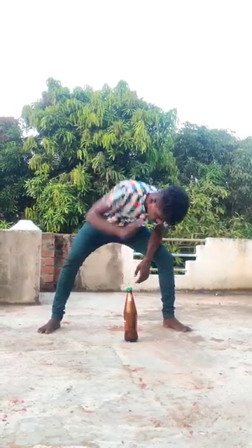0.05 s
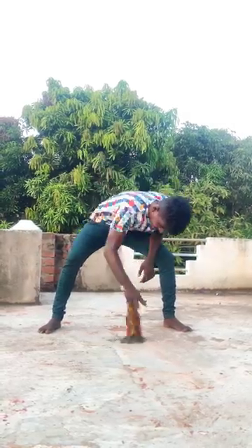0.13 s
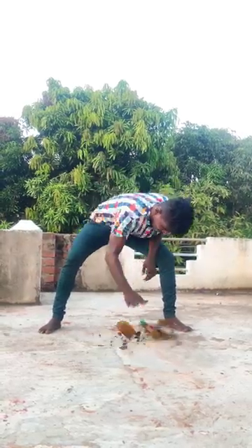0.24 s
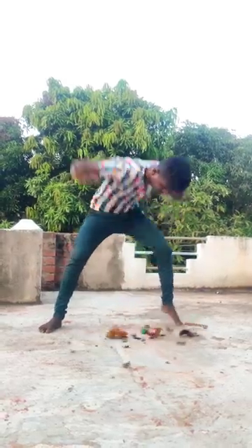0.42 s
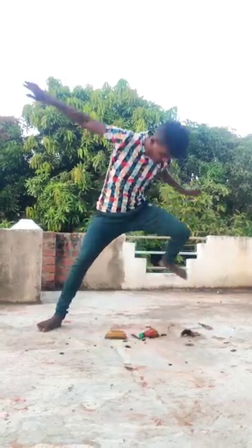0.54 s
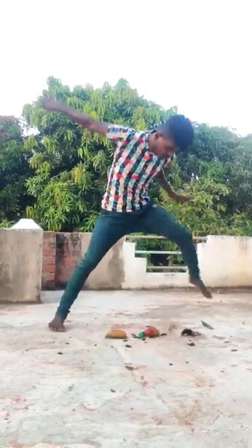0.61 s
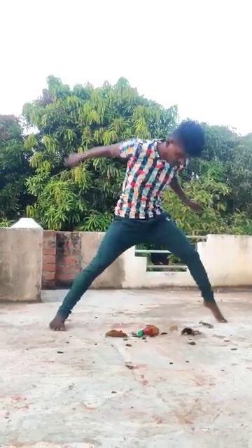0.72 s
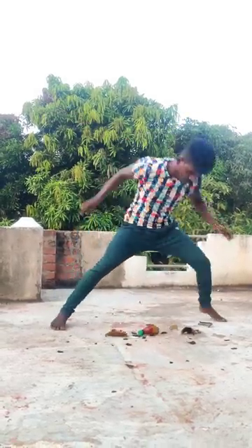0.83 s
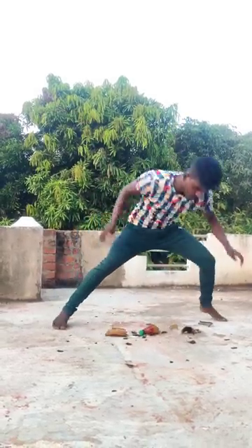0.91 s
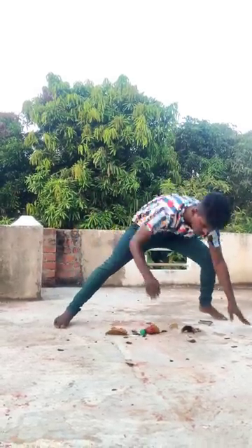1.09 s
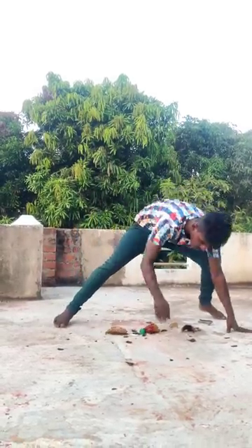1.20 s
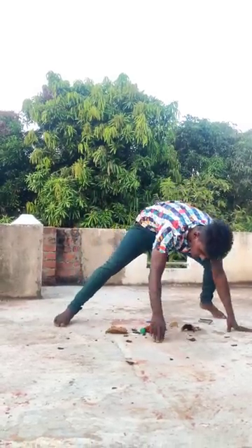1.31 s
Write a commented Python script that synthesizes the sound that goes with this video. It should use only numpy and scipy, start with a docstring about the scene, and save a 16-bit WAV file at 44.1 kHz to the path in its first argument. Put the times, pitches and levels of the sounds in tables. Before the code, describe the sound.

A glass bottle smashes on concrete, with liquid spattering and shards clinking as they settle.

```python
"""Clothes rustle with a swing, then a glass bottle cracks, thuds and bursts on a concrete terrace.
Splinters and liquid spray over the floor while a hollow note sinks. The larger pieces bounce, each
contact exciting their natural modes. A bare foot slaps down, a faint far tone comes and goes, and
the last pieces settle. Throughout, outdoor air murmurs and low walls return short echoes."""
import sys
import numpy as np
from scipy import signal
from scipy.fft import rfft, irfft
from scipy.io import wavfile
from scipy.ndimage import uniform_filter1d

SR = 44100
rng = np.random.default_rng(int(sys.argv[2]) if len(sys.argv) > 2 else 0)


def persist_wave(psi):
    """Save psi, clipped to +-1, as 16-bit WAV."""
    counts = np.round(np.clip(psi, -1, 1) * 32767).astype(np.int16)
    wavfile.write(sys.argv[1], SR, np.atleast_2d(counts).T)


N = 59535
TIME = np.arange(N) / SR

# Spectra of the noise sources. Each row: frequency in Hz, relative level in dB.
AIR_SPECTRUM = [(15, -51.5), (25, -9), (277, -12), (427, -10.5), (503, -3.5), (796, -15.5), (1020, -9),
                (1290, -20.5), (2110, -14.5), (2910, -23.5), (16000, -30)]
RUSTLE_SPECTRUM = [(200, -13), (480, 3.5), (750, -6.5), (1200, 10), (2000, 6.5), (3000, -11.5),
                   (12000, -26.5)]
SLAP_SPECTRUM = [(200, -40), (390, -35), (660, -15), (930, -7), (1100, -14), (1670, 0.5), (2050, -9.5),
                 (2500, -6.5), (3150, -20), (3560, -8), (4220, -30.5), (5500, -16), (7700, -39),
                 (12000, -50)]
SPATTER_SPECTRUM = [(100, -18), (220, -10), (400, -9), (1000, 0), (1600, -1), (2400, 0), (4000, -7),
                    (6500, -7), (9000, -22), (16000, -34)]
SPLINTER_SPECTRUM = [(2400, -6.5), (4000, -6), (6200, 4.5), (8000, -2.5), (11000, 2), (15000, -6.5)]
TICK_SPECTRUM = [(300, -51), (900, -2.5), (2500, 3), (6000, 3.5), (10500, -4), (16000, -25)]
THUD_SPECTRUM = [(40, -46.5), (100, -37), (170, -23.5), (280, -45.5), (380, 1), (600, -13.5), (920, -2),
                 (1400, -10.5), (2600, -14), (6000, -21)]
CRACK_SPECTRUM = [(40, -21), (90, -34.5), (300, -19.5), (555, -1.5), (1360, -7), (2650, -5), (5250, -1.5),
                  (6740, 0), (9000, -15), (14200, -15.5), (16000, -40.5)]
# Likeness of the noise at the two ears. Each row: frequency in Hz, left-right correlation.
CORRELATION = [(60, 1), (350, 0.75), (1000, 0.28), (3000, 0.5), (12000, 0.2)]
# Envelopes of cloth, liquid and splinters. Each row: time in seconds, level in dB.
RUSTLE_ENVELOPE = [(0, -52), (0.06, -66), (0.143, -73.5), (0.165, -55.5), (0.195, -50.5), (0.215, -41)]
SPATTER_ENVELOPE = [(0.205, -80), (0.225, -75), (0.28, -39.5), (0.36, -32.5), (0.42, -40), (0.47, -37.5),
                    (0.56, -42.5), (0.64, -44), (0.69, -45), (0.77, -54.5), (0.95, -66), (1.09, -55),
                    (1.14, -63), (1.19, -49), (1.28, -81)]
SPLINTER_ENVELOPE = [(0.205, -73), (0.215, -53), (0.275, -43), (0.34, -32), (0.41, -34.5), (0.47, -37.5),
                     (0.52, -38.5), (0.56, -39.5), (0.65, -51.5), (0.76, -52.5), (0.93, -67.5), (1.08, -55),
                     (1.15, -57.5), (1.35, -78)]
# Partials of the far tone. Each row: frequency in Hz, level in dB.
FAR_PARTIALS = [(763, -64.5), (1013, -66), (1268, -73)]
# Course of the hollow note. Each row: time in seconds, frequency in Hz, level in dB.
HOLLOW_GLIDE = [(0.28, 669.3, -68), (0.307, 632.8, -34.5), (0.333, 610, -45.5), (0.431, 599, -47.5),
                (0.484, 560.6, -33.5), (0.53, 562, -47.5), (0.58, 559.6, -40), (0.661, 559, -56.5),
                (0.781, 563, -76)]
# Blows of the foot, the bottle's body and the breaking glass.
# Each row: start in seconds, level in dB, time to decay by 60 dB (T60) in seconds.
FOOT_SLAPS = [(0.8018, -11.5, 0.026), (0.8085, -29.5, 0.015), (0.828, -26, 0.021), (0.853, -53, .09)]
BODY_THUDS = [(0.2055, -23.5, 0.15), (0.2215, -14, 0.069), (0.231, -22, 0.12)]
GLASS_CRACKS = [(0.2053, -5, 0.017), (0.2105, -14, 0.061), (0.231, -22.5, 0.037)]
# Modes of the slap's hollow ring and of each named glass piece.
# Each row: frequency in Hz, relative level in dB, T60 in seconds, left minus right in dB.
SLAP_MODES = [(385, -45.5, 0.13, -3), (952, -27, 0.11, -0.5), (1598, -28.5, 0.047, -10),
              (1765, -22.5, 0.053, 4.5), (2390, -44, 0.065, -5)]
PIECE_MODES = { "large": [(2276, -1, 0.23, 0), (2300, -16.5, 0.24, -7.5), (1980, -23.5, 0.61, 0),
               (3470, -16.5, 0.23, -14), (4880, -16, 0.19, 1.5), (6255, -20.5, 1, -0.5),
               (7000, -9.5, 0.12, 2.5)], "bright": [(2980, -5.5, 0.17, 0), (4556, -29, 0.96, -17),
               (5600, -8.5, 0.2, 6), (5593, 4.5, 0.065, 7), (5946, -3.5, 0.088, 6), (6990, -13.5, 0.39, 2),
               (8400, -7.5, 0.082, -9), (10900, -10, 0.067, 15), (10530, -29, 0.06, 3),
               (12820, -22.5, .14, -15)], "flat": [(2270, -2, 0.098, 7), (2290, 1, .1, 4),
               (3600, -10, 0.057, -14), (5002, 0, 0.11, 1)], "curved": [(2685, -2.5, 0.12, 6),
               (2663, -12, 0.32, 2), (2430, -3, 0.057, -1.5), (3053, -14, 0.099, -17),
               (5022, -2.5, 0.11, 2.5), (5628, 0.5, 0.057, 6.5)], "thin": [(4040, 1.5, 0.086, -19),
               (4950, -5, 0.45, 9), (6210, 12, 0.11, 0), (6360, 7, 0.086, 9), (8400, -21, 0.36, -3.5),
               (8900, -16, 0.145, 4.5), (9870, 1, 0.18, 12.5), (11560, -22, 0.16, -8.5),
               (14400, -13.5, .14, -11)]}
# Pieces hit the floor.
# Each row: start in seconds, piece, ring level in dB, tick level in dB, left minus right in dB.
BOUNCES = [(0.298, "curved", -32, -21, 0), (0.321, "thin", -34, -12.5, 6.5),
           (0.326, "curved", -58, -29, -7), (0.3419, "bright", -17.5, -13.5, 0.5),
           (0.344, "curved", -22, -29, -2), (0.353, "large", -21, -35, 6.5),
           (0.367, "bright", -30, -19, -14), (0.424, "curved", -27, -45, -1),
           (0.443, "large", -26, -25.5, 20), (0.457, "large", -31.5, -32, 23),
           (0.4785, "thin", -39, -26, 4), (0.5394, "curved", -36, -20, -4),
           (0.547, "large", -32, -35, 14.5), (0.5948, "thin", -44, -50, -14),
           (0.6355, "thin", -48.5, -28, -7), (0.6633, "bright", -28.5, -16.5, 5.5),
           (0.680, "thin", -49, -21, 7.5), (0.701, "flat", -34, -44, 2.5),
           (0.748, "bright", -43, -33.5, 3.5), (0.842, "thin", -77, -50, 12),
           (0.881, "thin", -66, -36.5, -1), (0.896, "flat", -41.5, -46, 9.5),
           (0.908, "flat", -40.5, -36, 2), (1.072, "curved", -50.5, -40.5, 15),
           (1.081, "bright", -43.5, -37.5, 4.5), (1.169, "curved", -37, -31, 7.5),
           (1.182, "bright", -47.5, -54, 5.5), (1.194, "curved", -43, -41.5, -13.5),
           (1.206, "flat", -57, -50, 10.5)]
# Wall reflections. Each row: left and right delays in seconds, gain before filtering in dB.
WALL_ECHOES = [(0.013, .015, -13.5), (.027, .0285, -32), (.053, .051, -32)]

LEFT_LEAD_S, SPRAY_PAN_DB = 0.0001, 0.5


def from_db(db):
    """Amplitude grows tenfold for every 20 dB."""
    return 10 ** (np.asarray(db) / 20)


def unit_rms(x):
    """Division by the rms value gives unit mean power."""
    return x / np.sqrt(np.mean(x ** 2) + 1e-20)


def envelope(rows):
    """Straight lines in dB give exponential rises and falls, with silence outside them."""
    return from_db(np.interp(TIME, *np.transpose(rows), left=-150, right=-150))


def at_hz(points, hz):
    """Interpolation in log frequency treats all octaves alike."""
    frequencies, values = np.transpose(points)
    return np.interp(np.log(np.maximum(hz, 1)), np.log(frequencies), values)


def place(x, pan_db, lead_s=0):
    """Differences of level and arrival time set direction; positive values favour the left."""
    left, right = np.broadcast_to(x, (2, N))
    delayed = np.interp(TIME - lead_s, TIME, right)
    return np.array([left * from_db(pan_db / 2), delayed * from_db(-pan_db / 2)])


def coloured(white, spectrum):
    """The weighted sum and difference of two independent signals form a partly correlated pair."""
    hz = np.fft.rfftfreq(N, 1 / SR)
    alike = np.clip(at_hz(CORRELATION, hz), -.99, .99)
    mid, side = rfft(white) * from_db(at_hz(spectrum, hz))
    mid, side = np.sqrt(1 + alike) * mid, np.sqrt(1 - alike) * side
    return unit_rms(irfft([mid + side, mid - side], N))


def noise(spectrum):
    """Filtered white noise takes on the spectrum of the filter."""
    return coloured(rng.standard_normal((2, N)), spectrum)


def decay(start, t60, contact_s=0.0015):
    """A damped vibration builds during contact and dies exponentially."""
    age = np.maximum(TIME - start, 0)
    return np.minimum(age / contact_s, 1) * from_db(-60 * age / t60)


def burst(source, start, db, t60):
    """An impact is a transient whose energy is set by its level and decay time."""
    shape = decay(start, t60)
    return from_db(db) * unit_rms(source * shape) * np.sqrt(np.mean(shape ** 2))


def blows(rows, spectrum):
    """Successive blows on one body share a spectrum and superpose."""
    return sum(burst(noise(spectrum), *row) for row in rows)


def grains(per_s, spread_db):
    """Independent small impacts form shot noise: random clicks of uneven size."""
    sizes = from_db(spread_db * np.minimum(rng.exponential(1, N), 4))
    return (rng.random(N) < per_s / SR) * sizes * rng.choice([-1, 1], N)


def modal_ring(modes, strikes, spread_db=2):
    """Each strike adds energy to every natural mode, and each mode loses it at its own rate."""
    ear_time = TIME - np.array([[0], [.00005]])  # the right ear hears it later
    out = 0
    for hz, mode_db, t60, mode_pan_db in modes:
        chance_db = spread_db * rng.standard_normal(len(strikes))
        energy = 0
        for (start, db, pan_db), extra_db in zip(strikes, chance_db):
            balance = from_db([pan_db + mode_pan_db, -pan_db - mode_pan_db])
            amplitude = from_db(db + mode_db + extra_db) * decay(start, t60)
            energy = energy + np.outer(balance, amplitude ** 2)
        out = out + np.sqrt(energy) * np.sin(2 * np.pi * (hz * ear_time + rng.random()))
    return out


def outdoor_air():
    """Stationary noise forms a quiet floor under the scene."""
    return from_db(-68) * noise(AIR_SPECTRUM)


def far_tone(start_s=0.94, end_s=1.17, fade_s=0.047):
    """Three steady partials superpose into a faint tone that fades in and out."""
    gate = np.clip(np.minimum(TIME - start_s, end_s - TIME) / fade_s, 0, 1)
    return gate * sum(from_db(db) * np.sin(2 * np.pi * hz * TIME) for hz, db in FAR_PARTIALS)


def clothes_rustle():
    """Friction in the cloth makes noise that follows the swing."""
    return place(envelope(RUSTLE_ENVELOPE) * noise(RUSTLE_SPECTRUM), SPRAY_PAN_DB)


def hollow_note(waver_db=3, upper_ratio=1.735, upper_db=-6.5):
    """A cavity resonance, likely air in the broken neck, wavers and sinks with a weaker upper mode."""
    times, hz, db = np.transpose(HOLLOW_GLIDE)
    phase = 2 * np.pi * np.cumsum(np.interp(TIME, times, hz)) / SR
    smoothing = signal.butter(2, 40, fs=SR, output="sos")
    waver = unit_rms(signal.sosfilt(smoothing, rng.standard_normal((2, N))))
    lower_gain, upper_gain = from_db(waver_db * waver)
    lower = lower_gain * np.sin(phase)
    upper = from_db(upper_db) * upper_gain * np.sin(upper_ratio * phase + waver[0])
    return place(np.sqrt(2) * (lower + upper) * envelope(list(zip(times, db))), 0, LEFT_LEAD_S)


def bare_foot(pan_db=1):
    """Ball and sole land, then scuff; the first impact excites a short hollow resonance."""
    slaps = place(blows(FOOT_SLAPS, SLAP_SPECTRUM), pan_db)
    return slaps + modal_ring(SLAP_MODES, [(FOOT_SLAPS[0][0], 0, pan_db)])


def spatter(drop_share=0.65):
    """The shot noise of drops and grit adds in power to a smooth wash of foam."""
    drops = unit_rms(np.array([grains(per_s=4600, spread_db=5) for _ in range(2)]))
    foam = rng.standard_normal((2, N))
    spray = coloured(np.sqrt(drop_share) * drops + np.sqrt(1 - drop_share) * foam, SPATTER_SPECTRUM)
    return place(spray * envelope(SPATTER_ENVELOPE), SPRAY_PAN_DB, LEFT_LEAD_S)


def splinters(count=56, t60_cycles=1500):
    """Each small fragment is a damped resonator with its own pitch and place, struck at random."""
    clicks = grains(per_s=800, spread_db=1.5)
    struck = rng.integers(0, count, N)
    pitches_hz = np.geomspace(2400, 15000, count) * rng.uniform(.98, 1.02, count)
    out = 0
    for k, hz in enumerate(pitches_hz):
        radius, angle = from_db(-60 * hz / (t60_cycles * SR)), 2 * np.pi * hz / SR
        feedback = [1, -2 * radius * np.cos(angle), radius * radius]
        ring = signal.lfilter([np.sin(angle)], feedback, clicks * (struck == k) + 1e-18)
        ring = place(ring, SPRAY_PAN_DB + 4 * rng.normal(), LEFT_LEAD_S * rng.normal(1, 1))
        out = out + from_db(at_hz(SPLINTER_SPECTRUM, hz)) * ring
    running_rms = np.sqrt(uniform_filter1d(np.mean(out ** 2, axis=0), size=2000) + 1e-12)
    return out / running_rms * envelope(SPLINTER_ENVELOPE)


def contact_ticks():
    """The brief, hard contact of a piece with concrete radiates a broadband tick."""
    contact = noise(TICK_SPECTRUM)
    return sum(place(burst(contact, start, db, t60=.016), pan_db, LEFT_LEAD_S)
               for start, _, _, db, pan_db in BOUNCES)


def ringing_pieces():
    """Each larger piece vibrates freely in its own modes after each of its bounces."""
    out = 0
    for name, modes in PIECE_MODES.items():
        strikes = [(start, db, pan_db) for start, piece, db, _, pan_db in BOUNCES if piece == name]
        out = out + modal_ring(modes, strikes)
    return out


def bottle_smash():
    """Brittle fracture radiates sharp cracks as the body, driven against the floor, thuds."""
    cracks = place(blows(GLASS_CRACKS, CRACK_SPECTRUM), pan_db=0.5, lead_s=LEFT_LEAD_S)
    thuds = place(blows(BODY_THUDS, THUD_SPECTRUM), pan_db=-4.5, lead_s=LEFT_LEAD_S)
    return cracks + thuds


def terrace_echoes(x):
    """Convolution gives dull reflections and a diffuse tail; the low walls return little bass."""
    response = rng.standard_normal((2, N)) * decay(start=.006, t60=0.23)
    response *= from_db(-8.5) / np.sqrt(np.sum(response ** 2) / 2)
    for left_s, right_s, db in WALL_ECHOES:
        response[[0, 1], [int(left_s * SR), int(right_s * SR)]] += from_db(db)
    response = signal.sosfilt(signal.butter(1, 3250, fs=SR, output="sos"), response)
    response = signal.sosfilt(signal.butter(2, 470, "high", fs=SR, output="sos"), response)
    return signal.fftconvolve(x, response, axes=1)[:, :N]


def scene():
    """Direct sound, reflections and background superpose; ringing glass feeds the echoes more."""
    impacts = bare_foot() + bottle_smash() + contact_ticks() + splinters() + spatter()
    rings = ringing_pieces()
    echoes = terrace_echoes(impacts + from_db(3) * rings)
    return impacts + rings + echoes + hollow_note() + outdoor_air() + clothes_rustle() + far_tone()


def record(dry):
    """A steep low-pass filter limits the bandwidth to 16 kHz."""
    return signal.sosfilt(signal.ellip(10, .1, 80, 16000, fs=SR, output="sos"), dry)


dry = scene()
out = record(dry)
persist_wave(out)
```